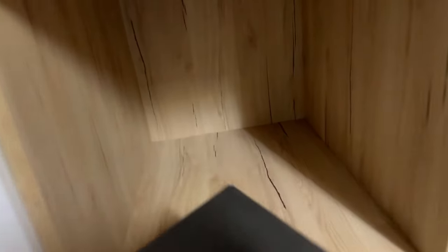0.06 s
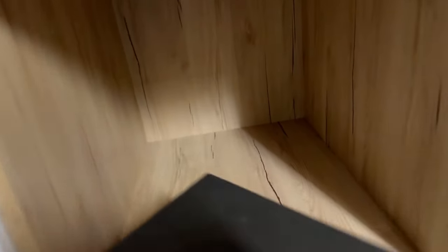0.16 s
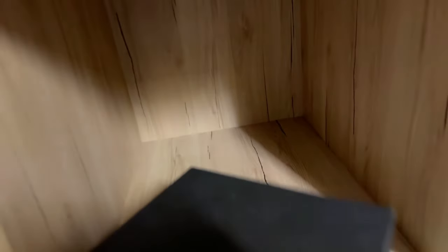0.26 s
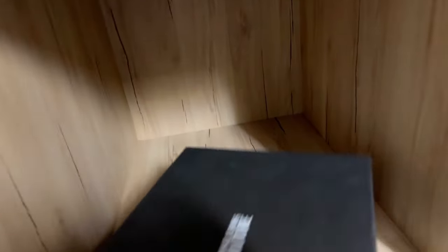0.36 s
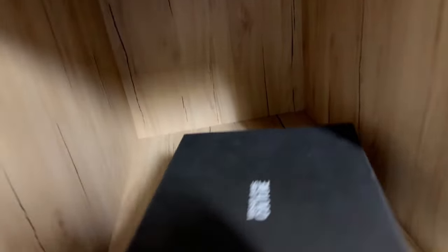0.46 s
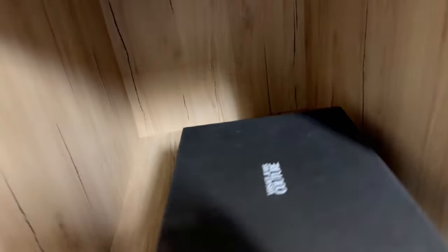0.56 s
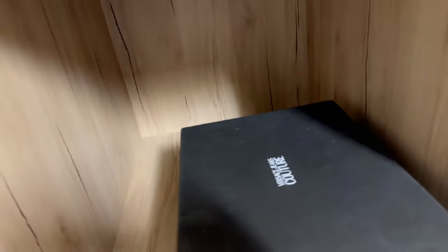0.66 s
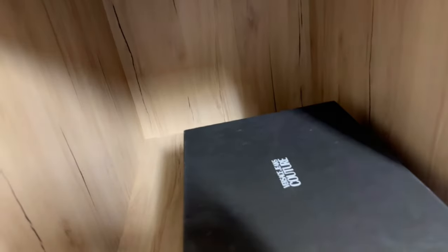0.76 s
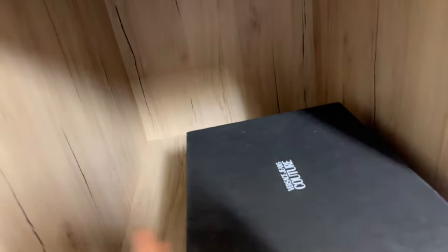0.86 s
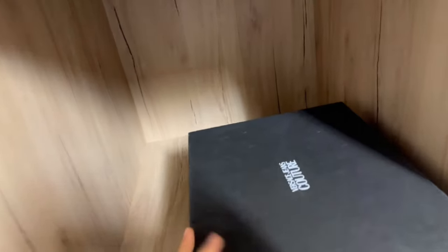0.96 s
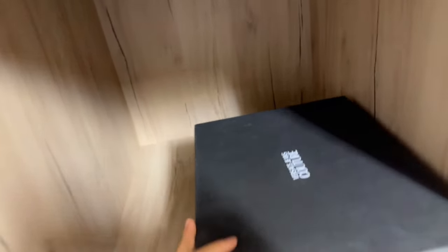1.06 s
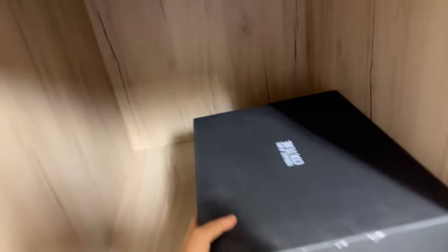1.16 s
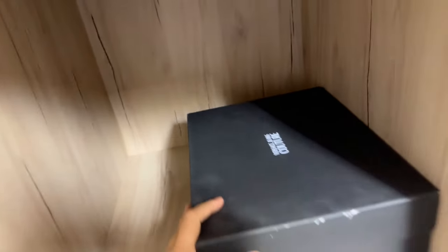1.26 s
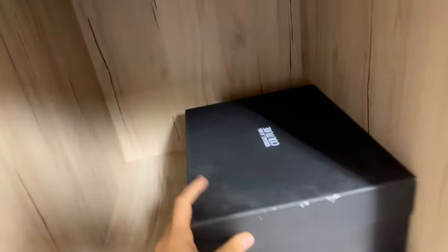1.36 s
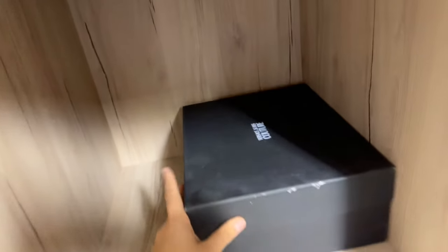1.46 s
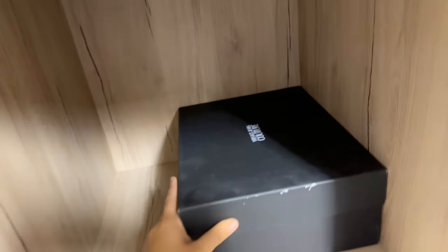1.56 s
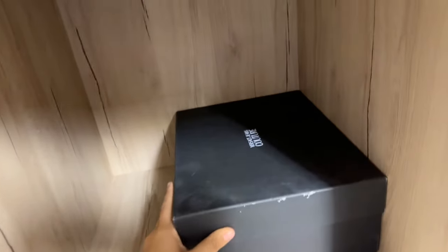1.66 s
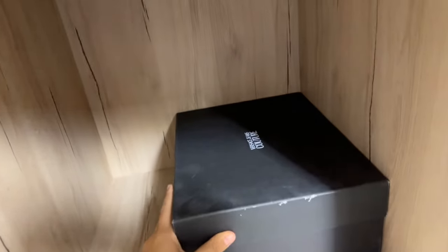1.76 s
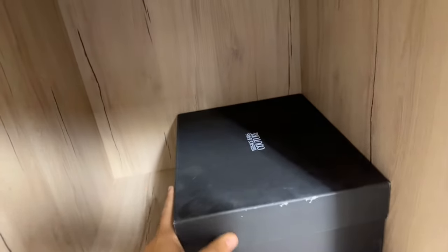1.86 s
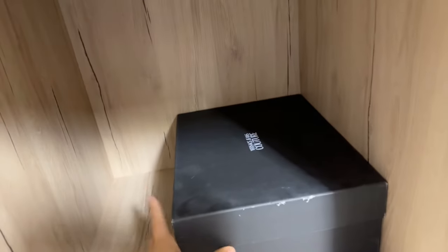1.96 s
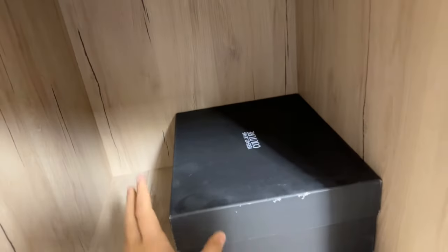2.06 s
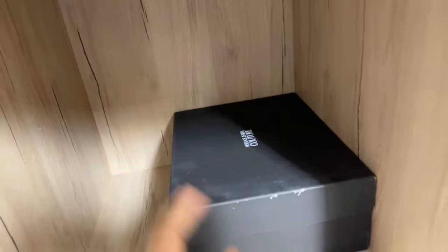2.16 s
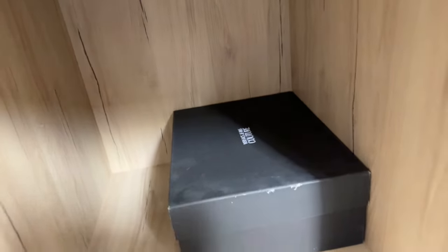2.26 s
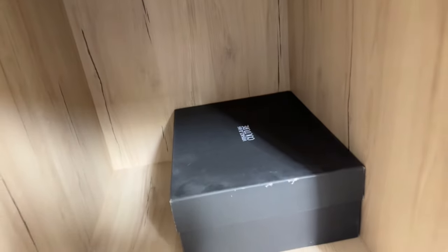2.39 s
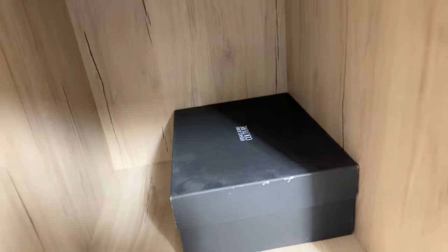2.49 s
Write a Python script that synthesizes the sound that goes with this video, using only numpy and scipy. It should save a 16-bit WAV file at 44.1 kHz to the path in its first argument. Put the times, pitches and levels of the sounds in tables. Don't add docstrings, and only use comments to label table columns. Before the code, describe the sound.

Cardboard box set down on wood with a hollow thud, scraped backward in two pushes, ending in a knock

```python
import sys
import numpy as np
from scipy import signal
from scipy.fft import rfft, irfft
from scipy.io import wavfile
from scipy.ndimage import uniform_filter1d

SR = 44100
rng = np.random.default_rng(int(sys.argv[2]) if len(sys.argv) > 2 else 0)


def to_wav(sig):
    pcm = np.clip(np.atleast_2d(sig), -1, 1) * 32767
    pcm = np.round(pcm).astype(np.int16)
    wavfile.write(sys.argv[1], SR, pcm.T)


def field_ratio(decibels):
    return 10 ** (np.asarray(decibels, dtype=float) / 20)


N = 110250

# (time [s], body level [dB], crack level [dB], contact [ms], body [0 shelf, 1 wall, 2 light tap])
KNOCK_EVENTS = [(.0183, -46, -68, .15, 2), (.0207, -38.5, -68, .45, 2), (.034, -52, -72, .6, 2),
                (.220, -35, -52, 2.16, 0), (.2275, -26, -39, .6, 0), (.2305, -14, -38, 0.6, 0),
                (.2300, -20, -50, .7, 2), (.2345, -16, -50, 1.1, 2), (.240, -15.5, -46, 1.12, 0),
                (.300, -32, -58, 1.5, 0), (.316, -32, -58, 1.5, 0), (.338, -25, -46, 0.75, 0),
                (.347, -26, -45, 0.78, 0), (.361, -29, -52, 0.75, 0), (.378, -35, -56, 1.23, 0),
                (.883, -47, -62, .7, 2), (.919, -34, -58, 1.27, 0), (1.0980, -28, -33, .25, 2),
                (1.1025, -31, -46, .6, 2), (1.110, -27, -48, 1.26, 0), (1.144, -29.5, -54, 1.23, 0),
                (1.203, -40, -62, 1.1, 2), (1.4950, -22, -22.5, .6, 2), (1.4980, -11, -36, 1.1, 1),
                (1.5075, -21, -42, 0.98, 1), (1.7415, -50, -70, .7, 2), (1.752, -46, -75, 2.5, 1),
                (1.858, -49, -72, .7, 2), (1.868, -43, -76, .8, 0), (2.497, -48, -68, .9, 0)]
# (frequency [Hz], level [dB], decay to -60 dB [s])
SHELF_MODES = [(168.3, -6, 0.11), (250.3, 1.5, .09), (349, -8, .07), (393, -7, .08), (427, -1.5, .075),
               (560, -13, .05), (711, -3, 0.07), (790, -9, 0.055), (860, -9, .05), (991, -9.5, .055),
               (1328, -19, .04), (1450, -19, .04)]
# (frequency [Hz], level [dB], decay to -60 dB [s])
WALL_MODES = [(163, 2, .2), (215, -6, .07), (258, 5, .055), (282, -17, .45), (330, -2, .06), (430, -7, .05),
              (510, -6, .13), (600, -4, .045), (684, -7, .05), (880, -6, .05), (1000, -14, .07),
              (1900, -15, .03)]
# (frequency [Hz], level [dB], decay to -60 dB [s])
TAP_MODES = [(300, -4, .05), (450, 0, .03), (700, -1, .025), (950, -3, .018), (1450, -5, .012),
             (1900, -7, .012), (2600, -12, .008)]
# (shelf [s], wall [s], tap [s])
MODE_LAG = (.006, .005, .0015)
# (frequency [Hz], density [dB per Hz])
CRACK_SPECTRUM = [(300, -12), (700, -4), (1300, -16), (3200, -10), (4500, -20), (7000, -26), (10300, -44),
                  (14000, -48)]
# (frequency [Hz], width [Hz], level [dB])
BOARD_RESONANCES = [(105, 22, 3), (170, 40, -1.5), (270, 50, -1.5), (340, 50, -5), (421, 45, .6),
                    (593, 110, -7.5), (787, 54, -6.5), (980, 90, -9), (1430, 60, -17), (1630, 80, -14)]
# (start [s], peak level [dB],
# frequency [Hz], swell [s], fall to -60 dB [s])
BOOM_EVENTS = [(.2415, -12.2, 103, .018, .1), (.245, -24, 150, .012, .05), (.305, -27, 118, .012, .07),
               (.347, -27, 95, .015, .07), (.375, -31, 125, .01, .05), (.385, -33, 62, .02, .08),
               (.565, -40, 78, .02, .08), (.595, -42, 115, .012, .05), (0.721, -41, 100.5, 0.014, .1),
               (.9005, -28.5, 112, .006, .05), (.926, -26, 99.5, 0.012, .14), (1.111, -21, 101, .03, .04),
               (1.141, -24, 125, .01, .025), (1.179, -36, 101.2, 0.013, .12), (1.235, -40, 150, .01, .06),
               (1.5045, -15, 103, .016, .075), (1.5105, -25, 140, .01, .04), (1.525, -29, 64, .015, .07),
               (1.543, -27, 100, .008, .1), (1.548, -32, 165, .015, .13), (1.61, -36, 85, .012, .04),
               (1.65, -41, 55, .02, .06), (1.868, -31, 105, .012, .07), (1.94, -47, 130, .02, .1),
               (2.156, -45, 78.7, .03, .1), (2.37, -43.5, 75, 0.017, .12)]
# (time [s], rubbing level [dB], board level over rubbing [dB], paper sheen over rubbing [dB])
PUSH_PATHS = [
    [(.212, -80, 8, 0), (.255, -62, 10, 5), (.30, -56, 9, 11), (.355, -55, 13, -1.5), (.45, -56, 11, -3),
     (.56, -60, 12, -5), (.67, -68, 14, -7), (.74, -88, 16, -7)],
    [(.87, -84, 19, -5), (.94, -63, 15, -5), (1.0, -60, 12, -1), (1.09, -57, 9, -1), (1.13, -50.5, 5, 3),
     (1.28, -51, 2, 2.5), (1.41, -51, 2, 1), (1.49, -50, 9, -1.5), (1.57, -76, 4, 3)],
    [(1.82, -88, 8, 0), (1.868, -73.5, 10, 9), (1.91, -75, 8, 0), (1.97, -86, 8, 0)],
]
# (frequency [Hz], density [dB per Hz])
RUB_SPECTRUM = [(300, -25), (1100, -4), (1400, -5), (2200, -3), (3900, -.3), (4500, -8), (6500, -20),
                (9000, -45)]
# (frequency [Hz], density [dB per Hz])
SHEEN_SPECTRUM = [(3500, -40), (5200, -20), (7000, -21), (8500, -31), (10300, -41), (12500, -29),
                  (15500, -26)]
# (time
# [s], peak level [dB], frequency [Hz], decay to -60 dB [s])
TICK_EVENTS = [(.083, -64, 2050, .04), (.284, -43, 3850, .035), (.296, -33, 2650, .032),
               (.297, -47, 3600, .035), (.298, -54.5, 8200, .03), (.7265, -56, 3800, .003),
               (.881, -55, 2800, .025), (.916, -52, 3900, .025), (1.4955, -26, 3050, .05),
               (1.4965, -34, 3195, .1), (1.4945, -37, 6000, .008), (1.496, -51, 13400, .01),
               (2.05, -62, 3500, .004), (2.2745, -55, 3940, .004), (2.354, -48, 3000, .003),
               (2.354, -50, 4300, .002), (2.354, -51, 5800, .002), (2.378, -61, 3500, .003)]
# (frequency [Hz], density [dB per Hz])
ROOM_SPECTRUM = [(12, -52.5), (20, -19.5), (66, -4), (106, -24), (170, -31), (282, -28.5), (520, -43),
                 (1000, -49), (2500, -55), (15500, -82)]


def level(x, db):
    return x * field_ratio(db) / np.sqrt(np.mean(x ** 2))


def colour(x, points):
    hz, db = np.array(points).T
    f = np.arange(len(x) // 2 + 1) * SR / len(x) + 1
    gain = field_ratio(np.interp(np.log(f), np.log(hz), db))
    return irfft(rfft(x) * gain, len(x))


def band(x, hz, width):
    return signal.lfilter(*signal.iirpeak(hz, hz / width, fs=SR), x)


def fade(t, t60):
    return np.exp(-np.log(1000) * np.maximum(t, 0) / t60) * (t >= 0)


def walk(rate):
    hold = int(SR / rate)
    steps = np.repeat(rng.standard_normal(size=1500), hold)[:N]
    return 1.226 * uniform_filter1d(uniform_filter1d(steps, hold), hold)


def add(out, s, x):
    i = int(s * SR)
    out[i:i + len(x)] += x[:len(out) - i]


def body_ring(t, body, contact_ms, chance):
    hz, db, t60 = np.array((SHELF_MODES, WALL_MODES, TAP_MODES)[body]).T[:, :, None]
    chance = chance[:len(hz), None]
    late = t - MODE_LAG[body] * 100 / hz
    scattered = field_ratio(db + 1.8 * chance)
    detuned_hz = hz * (1 + .015 * chance[::-1])
    ring = (scattered * fade(late, t60) * np.sin(2 * np.pi * detuned_hz * late)).sum(0)
    ring = np.convolve(ring, np.hanning(int(contact_ms * SR / 1000) + 3))[:len(t)]
    return ring / np.abs(ring).max()


def knocks():
    rattle_db, rattle_t60 = -22, .42
    crack_t60, tail_t60, tail_db = .028, .24, -18
    out, t = np.zeros(N), np.arange(SR // 2) / SR
    chance = rng.standard_normal(size=(len(KNOCK_EVENTS), 14))
    hiss = level(colour(rng.standard_normal(N), CRACK_SPECTRUM), 0)
    wash = colour(np.roll(hiss, N // 2), [(3500, 0), (7000, -8), (12000, -14)])
    rattle = colour(board(rng.standard_normal(N)), [(300, 0), (450, -7), (1200, -14)])
    rattle_env = field_ratio(rattle_db) * np.minimum(t / .015, 1) * fade(t, rattle_t60)
    crack_env = np.minimum(t / .0012, 1) * fade(t, crack_t60)
    tail_env = field_ratio(tail_db) * fade(t, tail_t60)

    def excerpt(noise, s):
        return np.roll(noise, -int(s * SR))[:len(t)]

    for (s, body_db, crack_db, contact_ms, body), c in zip(KNOCK_EVENTS, chance):
        ring = body_ring(t, round(body), contact_ms, c)
        add(out, s, field_ratio(body_db) * (ring + rattle_env * excerpt(rattle, s)))
        add(out, s, field_ratio(crack_db) * tail_env * excerpt(wash, s))
        bright = hiss if crack_db > -30 else wash
        add(out, s, field_ratio(crack_db) * crack_env * excerpt(bright, s))
    return out


def board(drive):
    dulled = colour(drive, [(1000, 0), (2000, -14), (6000, -50)])
    out = np.zeros(N)
    for hz, width, db in BOARD_RESONANCES:
        out += field_ratio(db + 2.5 * walk(18)) * level(band(dulled, hz, width), 0)
    return level(out, 0)


def booms():
    out, t = np.zeros(N), np.arange(SR // 2) / SR
    for s, db, hz, swell, t60 in BOOM_EVENTS:
        rise = np.sin(np.pi / 2 * np.minimum(t / swell, 1))
        fall = np.exp(-np.log(1000) * (np.maximum(t - swell, 0) / t60) ** 2.2)
        add(out, s, field_ratio(db) * rise * fall * np.sin(2 * np.pi * hz * t))
    return out


def fibres():
    grains_per_s, grain_db = 3000, 3.5
    sizes = field_ratio(grain_db * np.minimum(rng.exponential(size=N), 4))
    caught = rng.random(N) < grains_per_s / SR
    grains = caught * rng.standard_normal(N) * sizes
    return level(grains, -8) + rng.standard_normal(N)


def slide():
    t, out = np.arange(N) / SR, np.zeros(N)
    catch = fibres() * field_ratio(1.6 * walk(30))
    scale = np.std(colour(rng.standard_normal(N), RUB_SPECTRUM))
    rub = colour(catch, RUB_SPECTRUM) / scale
    sheen = colour(catch, SHEEN_SPECTRUM) / scale
    wood = board(fibres())
    for push in PUSH_PATHS:
        s, db, weight_db, sheen_db = np.array(push).T
        weight = field_ratio(np.interp(t, s, weight_db))
        gloss = field_ratio(np.interp(t, s, sheen_db))
        out += field_ratio(np.interp(t, s, db, -140, -140)) * (rub + weight * wood + gloss * sheen)
    return out


def ticks():
    out, t = np.zeros(N), np.arange(SR // 10) / SR
    rough = 1 + .22 * walk(400)
    for s, db, hz, t60 in TICK_EVENTS:
        env = np.minimum(t / (t60 * .15), 1) * fade(t, t60)
        add(out, s, field_ratio(db) * env * np.sin(2 * np.pi * hz * t))
    return out * rough


def room():
    out, bed = np.zeros(N), colour(rng.standard_normal(N), ROOM_SPECTRUM)
    # (low edge Hz, high edge Hz, sway dB)
    sways = [(14.7, 56, 3.1), (60, 147, 3), (140.5, 400, 2.2), (400, 1300, 1.5), (1300, 20000, 0.46)]
    for lo, hi, sway_db in sways:
        sos = signal.butter(2, [lo, hi], "band", fs=SR, output="sos")
        out += field_ratio(sway_db * walk(5.75)) * signal.sosfiltfilt(sos, bed)
    return level(out, -48.5)


def scene():
    struck = signal.lfilter(*signal.butter(2, 45, "high", fs=SR), knocks() + booms())
    return (struck + slide() + ticks() + room())[None]


def roll_off(x):
    return signal.sosfilt(signal.butter(12, 15910, fs=SR, output="sos"), x)


def record(dry):
    top_cut = signal.ellip(8, .2, 70, 15800, fs=SR, output="sos")
    mix = signal.sosfilt(top_cut, dry)
    return roll_off(mix)


dry = scene()
out = record(dry)
to_wav(out)
```